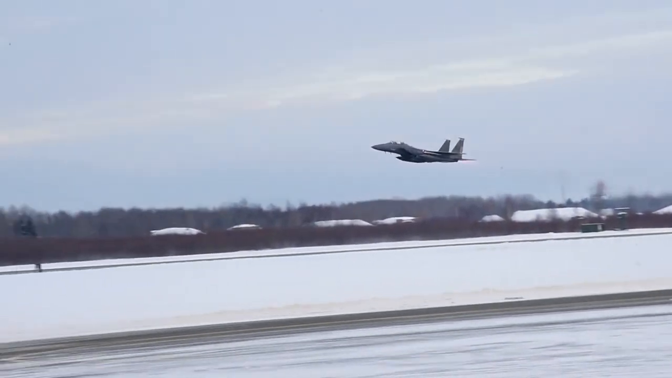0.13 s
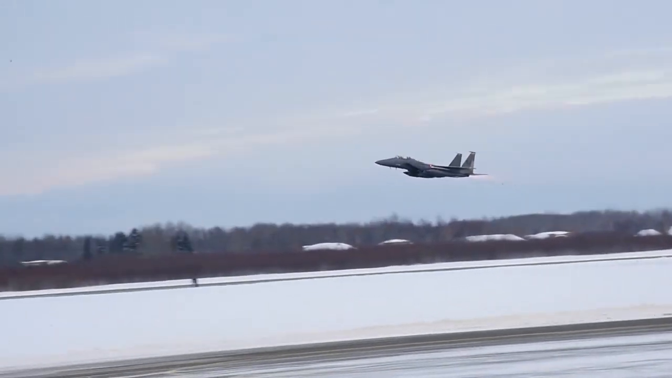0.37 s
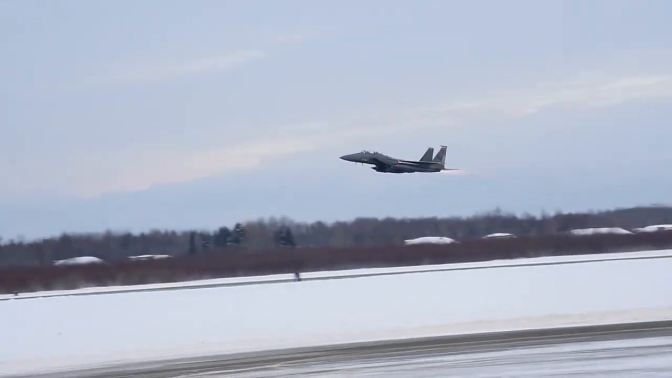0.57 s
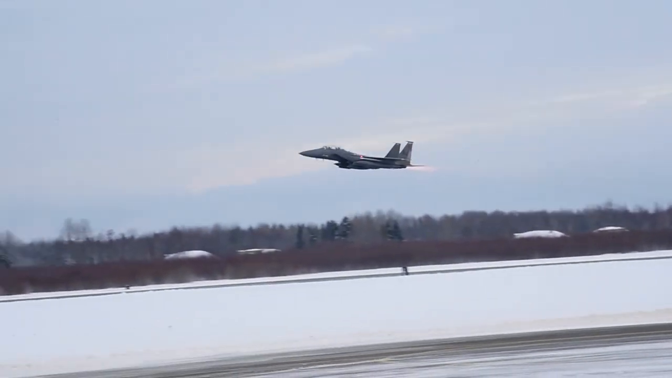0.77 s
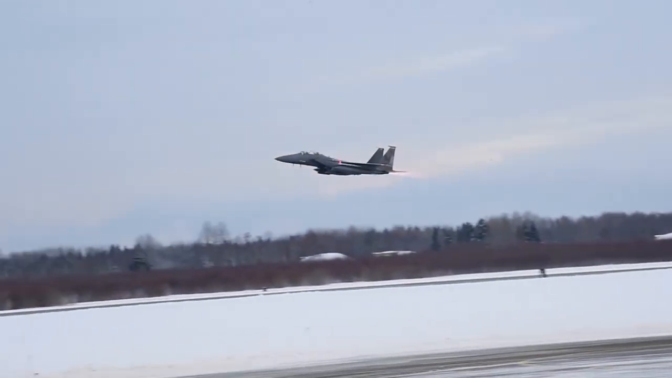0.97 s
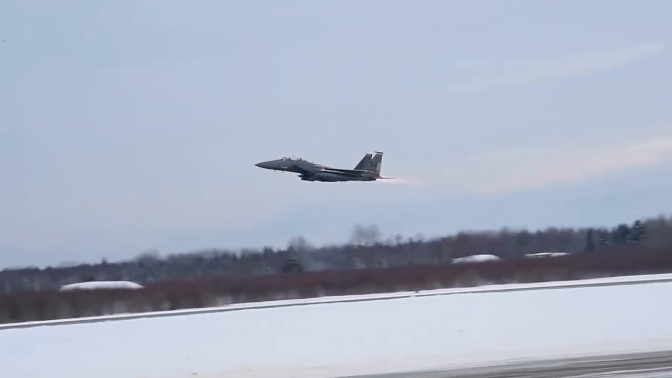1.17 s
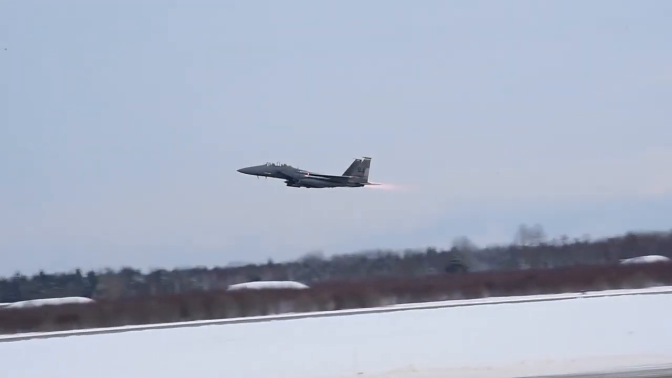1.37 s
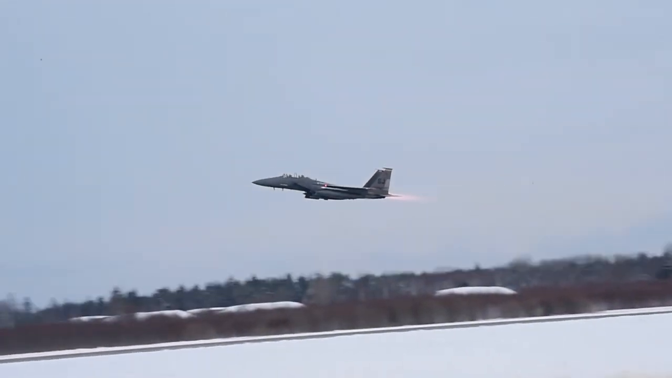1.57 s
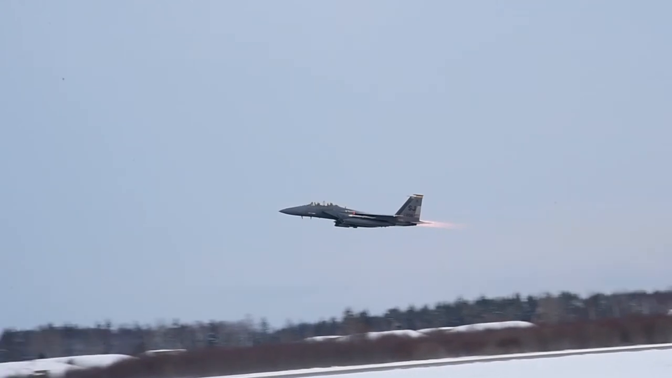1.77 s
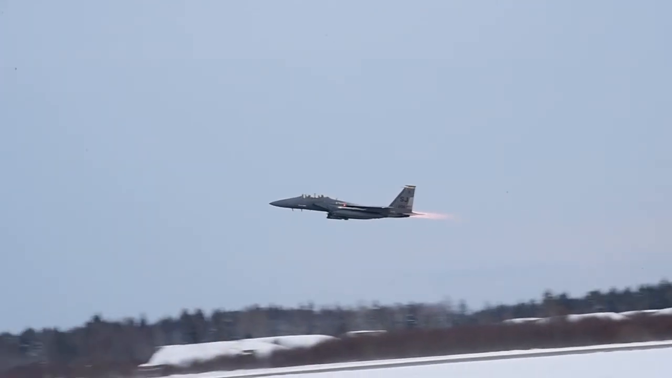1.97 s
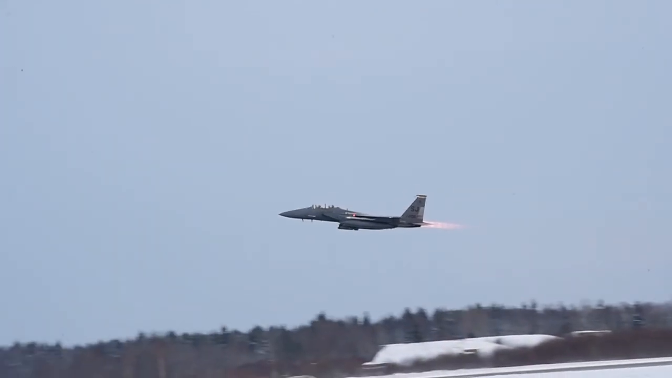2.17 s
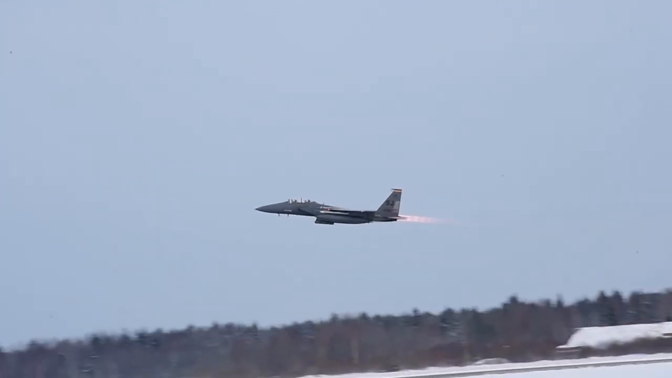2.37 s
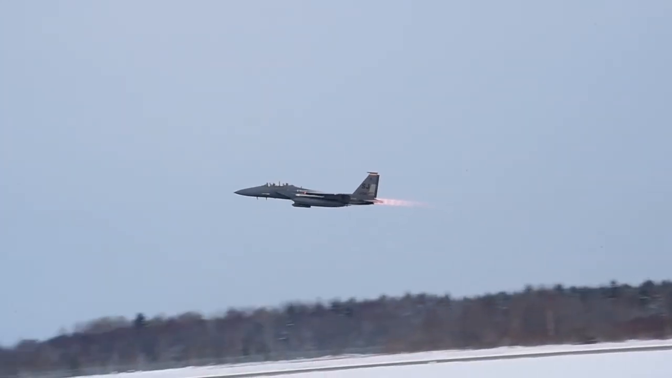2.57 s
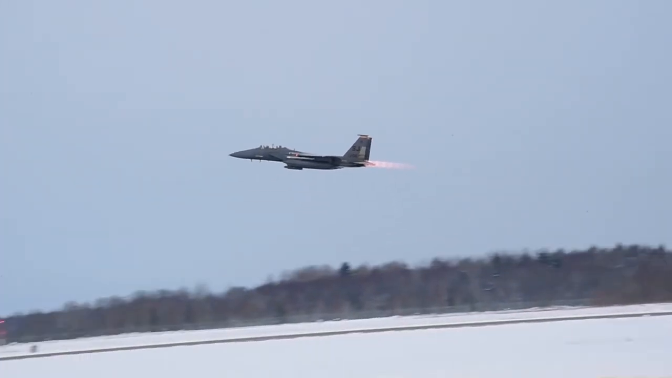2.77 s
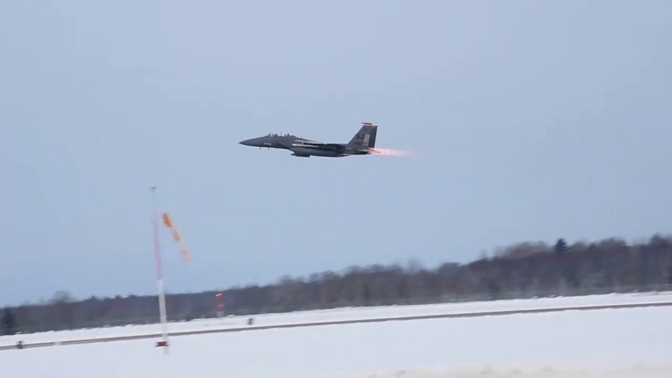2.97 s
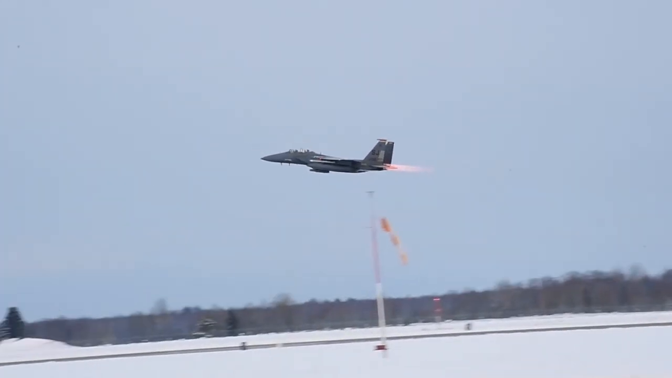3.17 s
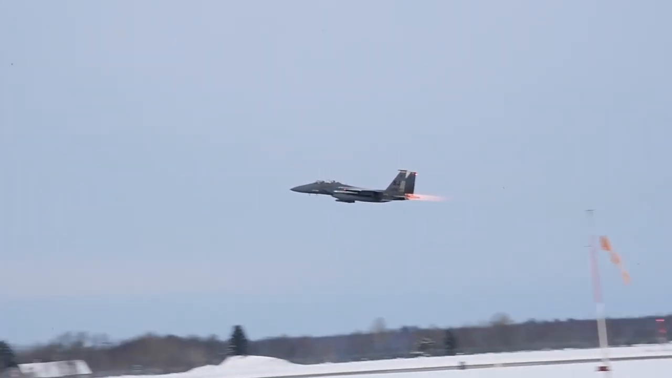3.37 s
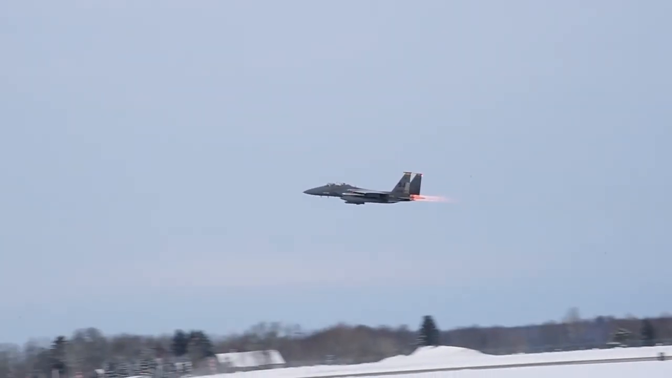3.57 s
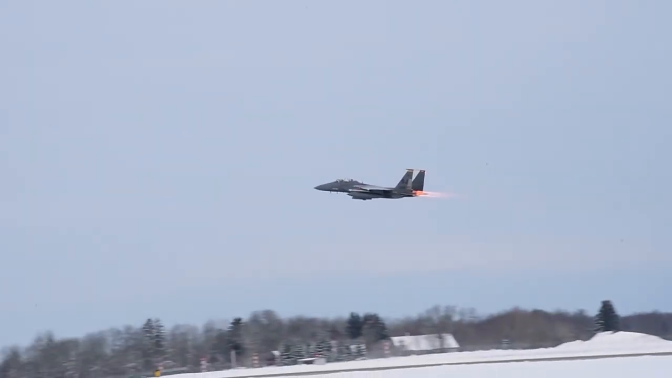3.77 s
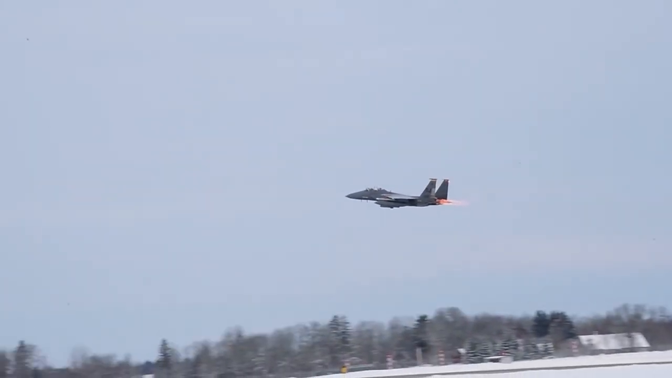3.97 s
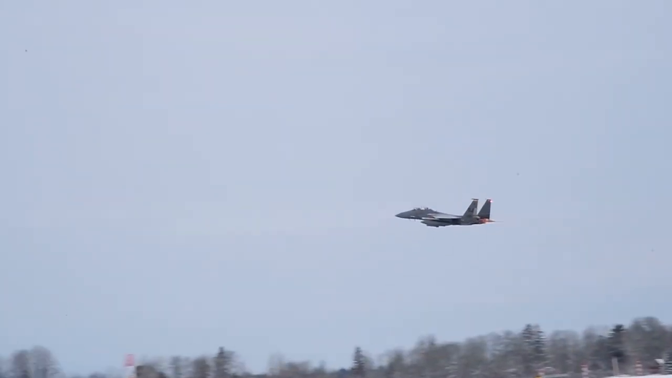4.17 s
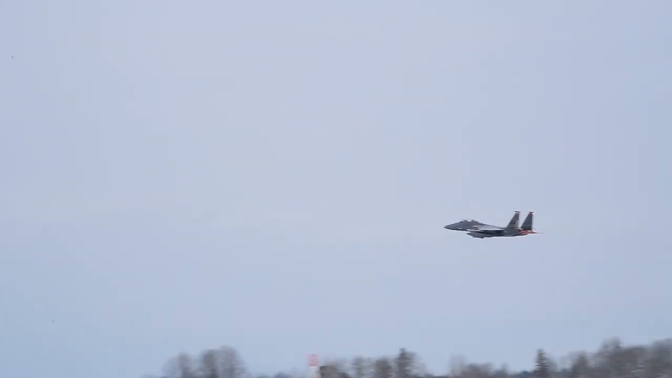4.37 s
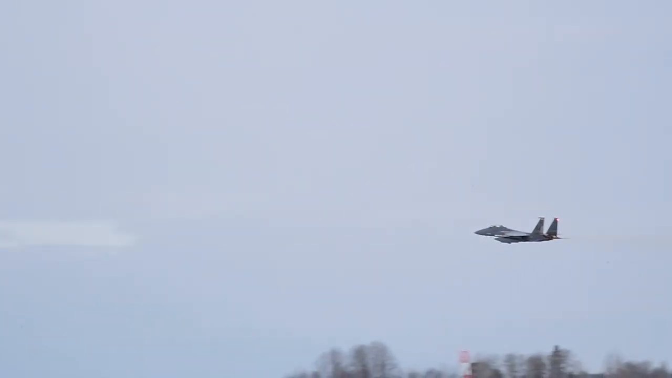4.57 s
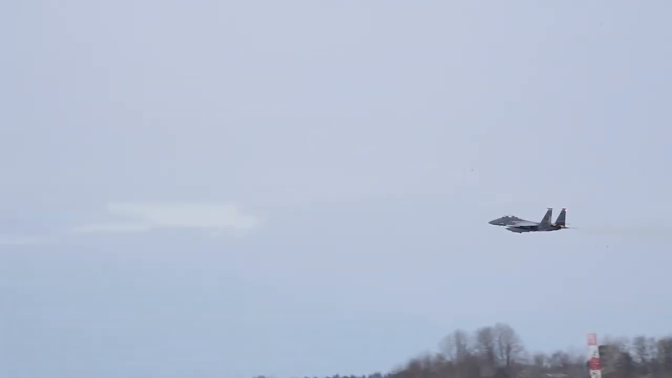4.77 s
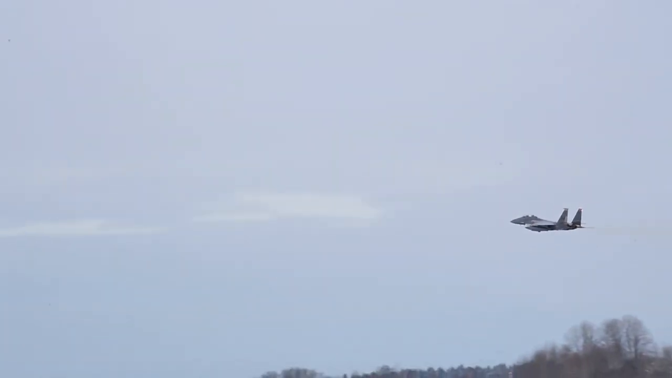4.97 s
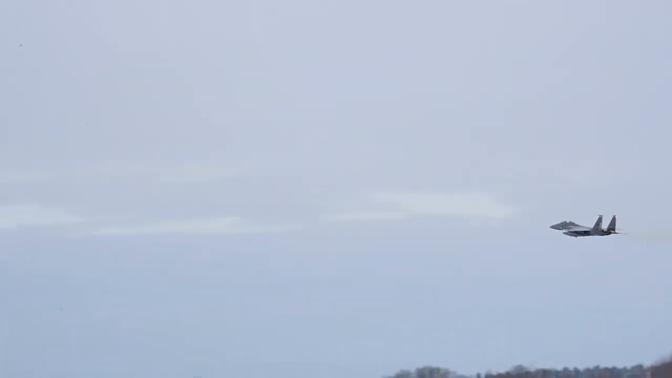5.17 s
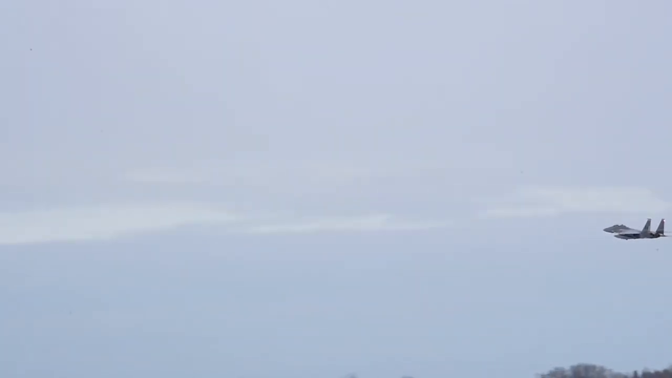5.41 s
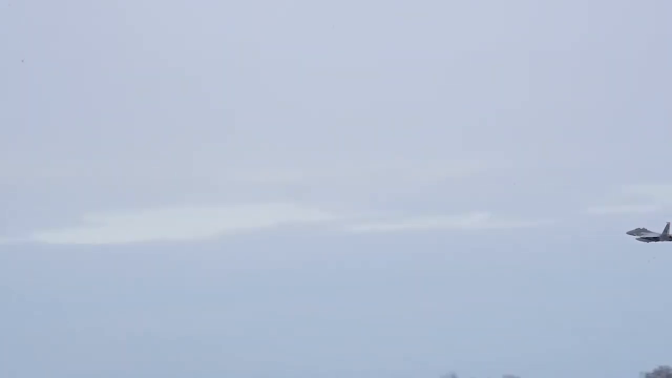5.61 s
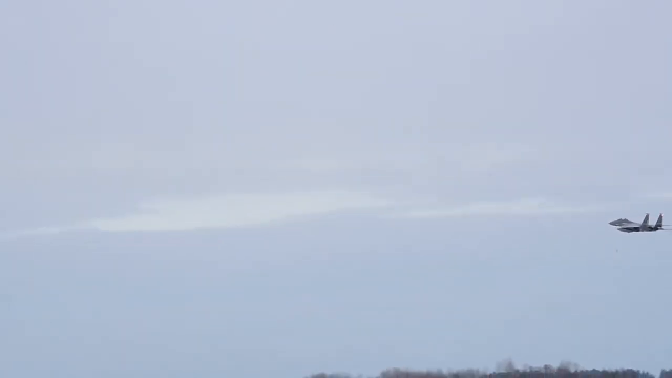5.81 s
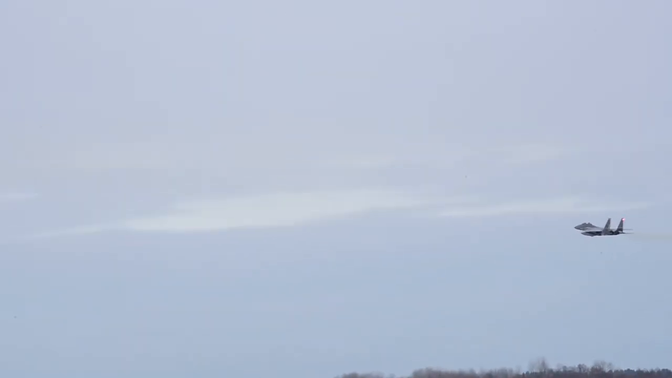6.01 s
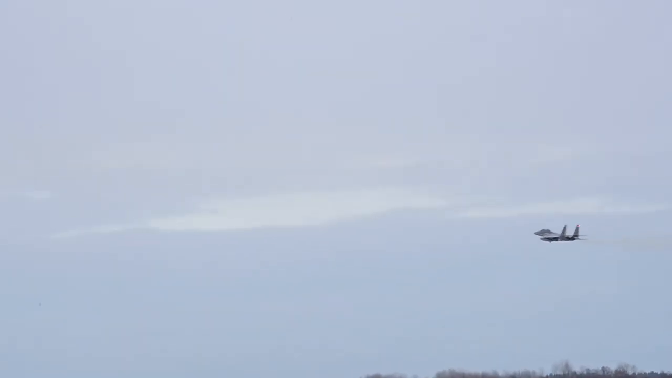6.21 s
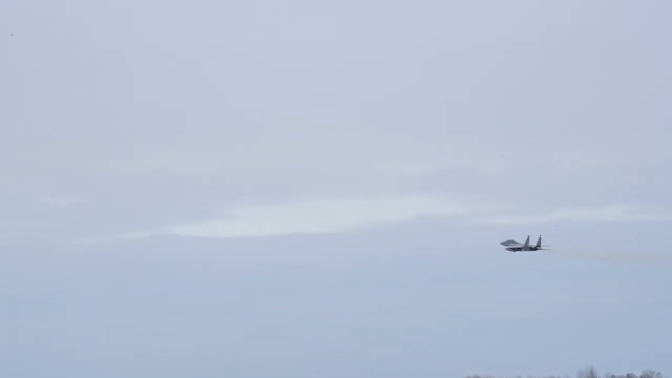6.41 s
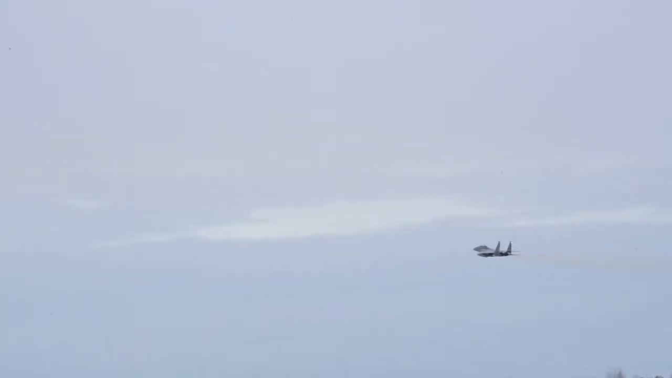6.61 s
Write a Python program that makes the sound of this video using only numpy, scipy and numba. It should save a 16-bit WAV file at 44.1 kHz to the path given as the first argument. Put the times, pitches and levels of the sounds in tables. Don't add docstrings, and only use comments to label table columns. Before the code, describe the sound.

A fighter jet on afterburner climbs away past the listener. First only a steady low drone of distant engines and faint wind, then sparse cracks, a fluttering mid-pitched howl and a fast tearing crackle. It passes with a heavy roar and hard pops, then recedes, still powerful but darker. Open snowy field, little echo, narrow stereo, slightly rounded peaks, no fade.

```python
import sys
import numpy as np
from scipy import signal
from scipy.fft import rfft, irfft, next_fast_len
from scipy.io import wavfile
from scipy.ndimage import uniform_filter1d, map_coordinates
from numba import njit

SR = 44100
rng = np.random.default_rng(int(sys.argv[2]) if len(sys.argv) > 2 else 0)


def bounce(signal):
    frames = np.transpose(np.atleast_2d(signal))
    limited = np.clip(frames, -1, 1)
    pcm = np.round(limited * 32767).astype(np.int16)
    wavfile.write(sys.argv[1], SR, pcm)


def volts_from_db(level):
    exponent = np.asarray(level, float) / 20
    return 10 ** exponent


N = 293265

# (time [s], plume power [dB], view from behind [0-1], treble lost in the air [dB])
FLYPAST = [(0, -38, 0.23, 3), (.2, -39.5, 0, 0), (.8, -38.5, 0.07, -10), (1.0, -29, 0, 1),
           (1.35, -30, 0.01, -1), (1.52, -28, 0, 4), (1.8, -26, 0.26, -0.5), (2.2, -21, 0.17, 0.5),
           (2.7, -22.5, 0.31, -5.5), (3.15, -25, 0.49, -9.5), (3.7, -21.5, 0.73, -0.5),
           (4.15, -20, 0.71, 4), (4.4, -21, 1, -2.5), (5.0, -22.5, 0.95, -6), (5.6, -21, 0.87, -3),
           (6.0, -20.5, 0.77, 6), (6.3, -20.5, 0.92, 12), (6.62, -21.5, 1, 17)]
# (time [s], howl centre [Hz], howl width [Hz], shock body top [Hz], front sharpness [dB])
EXHAUST_TONE = [(0, 470, 480, 1660, -17), (.85, 554, 445, 1770, 11), (1, 610, 340, 1810, 9),
                (1.12, 637, 330, 1780, 8), (1.24, 860, 403, 1830, 12.5), (1.36, 600, 350, 2010, 18),
                (1.6, 577, 370, 2130, 20), (1.9, 628, 312, 2080, 20), (2.2, 628, 374, 2120, 15),
                (2.7, 693, 460, 2180, 16), (3.0, 823, 467, 2170, 14.5), (3.2, 828, 497, 2250, 10),
                (3.7, 730, 523, 2280, 16.5), (4.15, 683, 450, 1970, 18), (4.6, 606, 430, 2080, 22),
                (5.6, 655, 440, 2030, 20), (6.1, 557, 423, 1760, 21), (6.65, 516, 420, 1680, 22)]
# (time [s], ground echo delay [ms], ground echo share [0-1],
# left port lag [samples], wavering of the lag [samples])
ARRIVAL = [(0, 0.11, 0.32, 4.1, 0.77), (1, 0.18, 0, 4.9, 0.55), (1.7, 0.45, 0, 5.44, 0.42),
           (2.0, 0.4, 0, 6.1, 0.23), (2.3, 0.16, 0, 5.9, 0.077), (2.6, 0.43, 0.01, 5.7, .2),
           (3.0, 0.3, 0.33, 5.8, 0.41), (3.4, 0.42, 0.62, 5.36, 0.2), (3.7, 0.39, 0.3, 5.8, 0.15),
           (3.95, 0.48, 0.76, 5.1, 0.22), (4.2, 0.58, 0.77, 5.5, 0.13), (4.55, 0.47, 0.5, 5.1, 0.4),
           (5.0, 0.48, 0.57, 4.8, 0.35), (5.6, 0.43, 0.61, 5.03, 0.38), (6.15, 0.58, 0.5, 5.3, 0.87),
           (6.65, 0.5, 0.25, 4.5, 1.4)]
# (time [s], share of the squared wave [0-1])
LOPSIDED_WAVES = [(0, 0), (.9, 0), (1.1, .22), (2.2, .2), (2.8, .13), (3.1, .02), (4, .05), (4.6, .19),
                  (5.4, .18), (6, .1), (6.65, .06)]

# (frequency [Hz], level [dB])
AIRFIELD_SPECTRUM = [(18, -74), (30, -26), (139, 5.5), (248, 4), (307, -14), (332, -7), (411, 7),
                     (436, 5.5), (1110, 0), (3090, -24.5), (4020, -66), (6800, -120)]
# (frequency [Hz], level [dB])
ROAR_SPECTRUM = [(35, -53), (60, -30.5), (152, -6), (225, 1.5), (367, 0), (436, -7.5), (480, -15),
                 (620, -7.5), (1060, -120)]
# (frequency [Hz], level [dB])
EDGE_SPECTRUM_AHEAD = [(5000, -34), (7500, -16.5), (9500, 1), (11500, 1.5), (13000, -1.5), (15500, 2)]
# (frequency [Hz], level [dB])
EDGE_SPECTRUM_BEHIND = [(5000, -38), (7500, -9.5), (10000, 1), (11500, 4.5), (13000, 6), (15500, 5)]
# (frequency [Hz], level [dB])
SCATTER_SPECTRUM_AHEAD = [(300, -27), (1500, -12.5), (3700, -15.5), (6000, -7.5), (12000, 2)]
# (frequency [Hz], level [dB])
SCATTER_SPECTRUM_BEHIND = [(300, -32), (1500, -16), (3200, -14), (4600, -7), (6500, -10.5), (12000, -5.5)]
# (frequency [Hz], level [dB])
LEFT_PORT_SHADE = [(500, 0), (1000, -1.2), (1700, -2.8), (3300, .6), (5000, -1.2), (8000, -2.6), (12000, 0)]
# (frequency [Hz], level [dB])
MICROPHONE_TREBLE = [(7000, 0), (9000, -5), (10500, -7.5), (12000, -10.5), (13500, -16.5), (14800, -18)]

# (time [s], level [dB], half length [s])
ROAR_ROLLS = [(.22, 5.5, .05), (.45, 6.5, .05), (1.8, -0.5, .1), (2.3, -6, 0.085), (2.95, 3, .1),
              (3.4, 1.5, 0.12), (4.05, 1, 0.063), (4.5, -1.5, 0.16), (5.0, 0, .1), (5.4, 0, 0.1),
              (5.75, 0.5, 0.08), (5.95, 3.5, 0.072), (6.3, 0.5, 0.11)]
# (time [s], level [dB], half length [s])
HOWL_SURGES = [(.42, 4, .04), (.51, 5.5, 0.039), (.8, -3, 0.063), (.96, 5, 0.032), (1.07, -1, 0.027),
               (1.13, 2.5, 0.033), (1.23, 1, 0.03), (1.33, -4.5, 0.078), (1.41, 7.5, 0.034),
               (1.5, -5, 0.029), (1.62, -1.5, 0.073), (1.76, -1, 0.039), (1.86, 1, 0.016),
               (1.93, -2.5, 0.033), (2.03, 0, 0.032), (2.42, 1, 0.021), (2.6, -0.5, 0.044),
               (2.8, -2, 0.033), (2.93, -2, 0.041), (3.15, 1.5, 0.02), (3.4, 0.5, 0.056), (3.72, -2, 0.025),
               (4.25, -0.5, 0.046), (5.45, -1, 0.044), (5.95, 0, 0.056), (6.05, -4.5, 0.039)]
# (time [s], level [dB], half length [s])
AIR_GUSTS = [(0.0, 15, 0.022), (0.51, 18, 0.027), (0.893, 6, 0.0091), (0.964, 7, 0.0077),
             (1.247, 6.5, 0.029), (1.314, 1.5, 0.026), (1.389, 12.5, 0.087), (1.618, 19, 0.058),
             (1.722, -5, 0.011), (1.861, 5.5, 0.029), (1.928, -1, 0.034), (1.98, 4, 0.092),
             (2.312, 5, 0.074), (2.422, -6, 0.028), (2.626, -3.5, 0.073), (2.817, -7.5, 0.018),
             (3.095, -5.5, 0.034), (3.24, -7.5, 0.024), (3.47, -3, 0.073), (3.617, 3.5, 0.052),
             (3.96, -4, 0.035), (4.034, 2.5, 0.025), (4.206, -5.5, 0.04), (4.48, -7, 0.032),
             (5.476, -10, 0.046), (5.882, -4, 0.12), (6.027, 3, 0.046), (6.112, -2, 0.083),
             (6.18, 7, 0.011), (6.64, 2.5, 0.013), (1.49, -3, 0.044), (2.14, 0.5, 0.0098), (2.54, 2, 0.048),
             (2.65, -2, 0.011), (2.885, 2.5, 0.0077), (3.02, 3, 0.025), (3.19, -1.5, 0.014), (3.21, 5, .01),
             (4.06, 2, 0.017), (4.11, -1.5, 0.032), (4.3, -0.5, .03), (5.6, -1, 0.073), (5.95, 2.5, 0.021),
             (6.0, 3.5, 0.017), (6.27, -8, 0.024), (6.39, 3, 0.037), (6.59, -1.5, 0.033)]

# (time [s], peak [dB])
LONE_SHOCKS = [(0.4723, -63), (0.4885, -55), (0.5097, -53), (0.607, -58), (0.8863, -59), (0.9248, -61),
               (0.96, -44), (0.999, -47), (1.0335, -43), (1.0714, -50), (1.0989, -43), (1.1494, -42),
               (1.203, -42), (1.2182, -29), (1.234, -36), (1.262, -30), (1.279, -39), (1.3089, -39)]
# (time [s], peak [dB])
NEARING_SHOCKS = [(1.2899, -41), (1.3088, -39), (1.3382, -38.5), (1.3613, -24), (1.3928, -30),
                  (1.4101, -37), (1.4213, -30), (1.5007, -46), (1.5375, -38), (1.5587, -33), (1.568, -29),
                  (1.5836, -28), (1.6206, -38), (1.6208, -27), (1.6622, -25), (1.6985, -39), (1.729, -49),
                  (1.7403, -36), (1.7619, -32), (1.783, -41), (1.8042, -43), (1.8225, -34), (1.866, -31),
                  (1.9469, -26), (1.9675, -27), (2.0405, -28), (2.08, -27), (2.113, -31), (2.1639, -22),
                  (2.1907, -26), (2.1983, -26), (2.2397, -24), (2.2726, -21), (2.2861, -28), (2.316, -28),
                  (2.3493, -19), (2.4333, -38), (2.4464, -27), (2.4635, -14), (2.4867, -23), (2.5076, -17),
                  (2.5201, -22), (2.6254, -20), (2.6353, -33), (2.637, -23), (2.6693, -23), (2.7071, -25),
                  (2.7199, -19), (2.757, -18), (2.8274, -23), (2.8538, -26), (2.8757, -23)]
# (time [s], peak [dB])
ABEAM_SHOCKS = [(2.938, -25), (2.9613, -19), (2.9886, -19), (3.0186, -19), (3.057, -20), (3.0889, -32),
                (3.1264, -19), (3.2066, -29), (3.238, -32), (3.2585, -37), (3.275, -27), (3.2953, -23),
                (3.3164, -21), (3.3332, -19), (3.377, -26), (3.4007, -22), (3.452, -22), (3.484, -35),
                (3.485, -25), (3.513, -30), (3.5122, -24), (3.5455, -27), (3.571, -29), (3.5798, -14),
                (3.5962, -21), (3.621, -26), (3.632, -26), (3.6477, -20), (3.672, -24), (3.6945, -23),
                (3.7429, -21), (3.7596, -40), (3.783, -25), (3.8192, -24), (3.8667, -22), (3.8954, -24),
                (3.946, -31), (3.973, -28), (3.9823, -30), (4.01, -24), (4.0587, -24), (4.092, -25),
                (4.1201, -37), (4.152, -28), (4.1789, -28), (4.2152, -31), (4.2277, -20), (4.253, -25),
                (4.267, -29), (4.2892, -19), (4.3096, -19), (4.374, -12)]
# (time [s], peak [dB])
BEHIND_SHOCKS = [(4.429, -24), (4.4517, -24), (4.4835, -27), (4.5217, -26), (4.5345, -26), (4.5684, -23),
                 (4.587, -20), (4.5919, -32), (4.617, -22), (4.6273, -28), (4.6807, -24), (4.7028, -23),
                 (4.7373, -19), (4.755, -19), (4.787, -24), (4.7933, -35), (4.8299, -29), (4.8433, -30),
                 (4.8646, -12), (4.8807, -26), (4.9018, -17), (4.9211, -21), (4.9487, -23), (4.962, -16),
                 (5.004, -24), (5.0119, -28), (5.018, -24), (5.0315, -22), (5.0528, -24), (5.0635, -21),
                 (5.0884, -24), (5.1032, -18), (5.1343, -20), (5.1651, -28), (5.1766, -32), (5.186, -23),
                 (5.1972, -22), (5.2214, -21), (5.232, -27), (5.251, -22), (5.277, -20), (5.3018, -27),
                 (5.3205, -20), (5.3437, -31), (5.3586, -20), (5.4018, -15), (5.4205, -31), (5.4403, -28),
                 (5.477, -37), (5.477, -13.5), (5.4984, -30), (5.5143, -20), (5.5612, -20), (5.5926, -17),
                 (5.6143, -25), (5.64, -19), (5.679, -19), (5.6904, -30), (5.6966, -24), (5.7313, -22)]
# (time [s], peak [dB])
LAST_SHOCKS = [(5.7444, -26), (5.763, -31), (5.7844, -22), (5.8085, -23), (5.8266, -23), (5.8494, -23),
               (5.8773, -31), (5.9032, -30), (5.9093, -27), (5.9224, -27), (5.9416, -22), (5.9561, -13),
               (5.9825, -29), (6.0202, -31), (6.0354, -16), (6.0676, -27), (6.096, -34), (6.1086, -30),
               (6.128, -35), (6.1676, -36), (6.1887, -16), (6.2246, -38), (6.2458, -29), (6.2663, -39),
               (6.2796, -48), (6.2907, -37), (6.325, -31), (6.334, -31), (6.3494, -39), (6.3714, -21),
               (6.3934, -39), (6.4018, -30), (6.4204, -22.5), (6.4441, -37), (6.4695, -38), (6.4832, -43),
               (6.5032, -37), (6.553, -46), (6.553, -38), (6.6044, -46), (6.6194, -33), (6.6366, -18)]

AIRFIELD_DB, WHINE_HZ, WHINE_DB = -31, 4160, -69
RUMBLE_DB, RUMBLE_HZ = -54.5, 45
HISS_DB = -89.5
ROAR_AHEAD_DB, ROAR_BEHIND_DB = -38.5, -18
HOWL_DB, BEAM_DB, BEAM_VIEW, BEAM_WIDTH = 4.5, 9, 0.51, 0.25
CRACKLE_DB, CRACKLE_PER_DB, FULL_POWER_DB = -42, 2.5, -22.5
GUST_IN_BODY, GUST_IN_HOWL = 0.45, 0.059
SHOCKS_PER_S, CRACK_DB = 800, -2
CLEAR_BEHIND_DB, DENSER_BEHIND_DB = -2.5, 2.5
TROUGH_AHEAD_DB, TROUGH_BEHIND_DB, HARD_JUMP = -6, -4, 6


def rms_one(x):
    return x / np.sqrt(np.mean(x ** 2) + 1e-20)


def in_time(rows):
    s, *columns = np.transpose(rows)
    return [np.interp(np.arange(N) / SR, s, c) for c in columns]


def butter(x, hz, kind, order):
    return signal.sosfilt(signal.butter(order, hz, kind, fs=SR, output="sos"), x)


def colour(x, points):
    hz, db = np.transpose(points)
    size = next_fast_len(N + 4096)
    bins = np.maximum(np.arange(size // 2 + 1) * SR / size, 1)
    gain = volts_from_db(np.interp(np.log(bins), np.log(hz), db))
    return irfft(rfft(x, size) * gain, size)[..., :N]


def drift(rate_hz):
    return rms_one(butter(rng.standard_normal(N + SR), rate_hz, "low", order=2)[SR:])


def later(x, samples):
    return map_coordinates(x, [np.arange(N) - samples], order=3, mode="nearest")


def swells(table):
    s = np.arange(0, N / SR + .002, .002)
    db = sum(db * np.exp(-((s - at) / max(half, .005)) ** 2) for at, db, half in table)
    return np.interp(np.arange(N) / SR, s, db)


def airfield():
    common, left, right = rng.standard_normal((3, N))
    ports = np.array([3.0 * common + 1.86 * left, later(common, 8.3) + 0.6 * right])
    hum = rms_one(colour(ports, AIRFIELD_SPECTRUM))
    whine = rms_one(butter(common, [WHINE_HZ - 160, WHINE_HZ + 160], "band", order=2))
    return volts_from_db(AIRFIELD_DB) * hum + volts_from_db(WHINE_DB) * whine


def wind():
    rumble = rms_one(butter(rng.standard_normal(N), RUMBLE_HZ, "low", order=4))
    return volts_from_db(RUMBLE_DB + 3.0 * drift(4)) * rumble


def amplifier_hiss():
    return volts_from_db(HISS_DB) * butter(rng.standard_normal((2, N)), [5000, 11500], "band", order=2)


def levels():
    power_db, behind, air_db = in_time(FLYPAST)
    gust_db = swells(AIR_GUSTS)
    roar_db = ROAR_AHEAD_DB + (ROAR_BEHIND_DB - ROAR_AHEAD_DB) * behind + swells(ROAR_ROLLS)
    beam_db = BEAM_DB * np.exp(-((behind - BEAM_VIEW) / BEAM_WIDTH) ** 2)
    howl_db = power_db + HOWL_DB + beam_db + GUST_IN_HOWL * gust_db + swells(HOWL_SURGES)
    body_db = power_db + GUST_IN_BODY * gust_db
    crackle_db = CRACKLE_DB + CRACKLE_PER_DB * (power_db - FULL_POWER_DB) - air_db + gust_db
    return roar_db, howl_db, body_db, crackle_db, behind


def shocks(eddies, crackle_db, behind):
    crowd_db = 1.8 * eddies + DENSER_BEHIND_DB * behind
    crowd_db = crowd_db + .45 * np.clip(crackle_db + 41, -25, 0)
    born = rng.random(N) < SHOCKS_PER_S * volts_from_db(crowd_db) / SR
    spread_db = 4.5 * np.minimum(rng.exponential(1, N), 2.4)
    jumps = born * volts_from_db(spread_db + 0.063 * eddies)
    jumps /= np.sqrt(uniform_filter1d(jumps ** 2, SR // 3) + 0.04)
    jumps *= volts_from_db(np.clip(crackle_db + 76, -14, 0))
    tables = (LONE_SHOCKS, NEARING_SHOCKS, ABEAM_SHOCKS, BEHIND_SHOCKS, LAST_SHOCKS)
    s, peak_db = np.transpose([row for table in tables for row in table])
    at = np.minimum((s * SR).astype(int), N - 1)
    jumps[at] = volts_from_db(np.clip(peak_db + CRACK_DB - crackle_db[at] + 10, 0, 28))
    return jumps + 1e-18


def mixing_roar(jumps):
    return rms_one(colour(rng.standard_normal(N) - 0.34 * jumps, ROAR_SPECTRUM))


@njit
def resonate(x, r, cosine):
    y = np.zeros_like(x)
    for i in range(2, len(x)):
        drive = (1 - r[i] ** 2) / 2 * (x[i] - x[i - 2])
        y[i] = drive + 2 * r[i] * cosine[i] * y[i - 1] - r[i] ** 2 * y[i - 2]
    return y


def shock_cell_howl(body, howl_hz, width_hz):
    cells = np.exp(-np.pi * width_hz / SR), np.cos(2 * np.pi * howl_hz / SR)
    turbulence = resonate(rng.standard_normal(N), *cells)
    howl = resonate(7.4 * turbulence - 0.5 * body, *cells)
    howl = butter(howl, [400, 2140], "band", order=4)
    return howl / np.sqrt(uniform_filter1d(howl ** 2, SR // 2))


def shock_thump(body, body_hz, behind):
    turbulence = 1.85 * volts_from_db(CLEAR_BEHIND_DB * behind) * rng.standard_normal(N)
    kick = butter(turbulence - body, 1340, "high", order=1)
    dull = np.clip((2200 - body_hz) / 600, 0, 1)
    crisp_kick = butter(kick, 2054, "low", order=4)
    dull_kick = butter(kick, 1606, "low", order=4)
    return rms_one((1 - dull) * crisp_kick + dull * dull_kick)


def shock_trough(jumps):
    hard = np.sqrt(np.maximum(jumps - HARD_JUMP, 0)) + 1e-18
    return rms_one(butter(butter(hard, 1320, "low", order=2), 330, "high", order=2))


def crackle_front(jumps, eddies, crackle_db, rear, sharp_db):
    hiss_db = 0.39 * eddies + 0.28 * np.clip(crackle_db + 31, -30, 0)
    hiss = rng.standard_normal(N) * volts_from_db(hiss_db)
    grain = jumps + .22 * hiss
    tick = butter(butter(grain, 3900, "low", order=2), 3460, "high", order=2)
    tick = rms_one(butter(tick, 10900, "low", order=2))
    steep = later(jumps ** 1.35 + .2 * hiss, 3)
    edge = (1 - rear) * colour(steep, EDGE_SPECTRUM_AHEAD) + rear * colour(steep, EDGE_SPECTRUM_BEHIND)
    return tick + volts_from_db(sharp_db - 26.5) * rms_one(edge)


def uneven_waves(plume):
    squared = plume ** 2 / np.sqrt(uniform_filter1d(plume ** 2, SR // 10))
    uneven = colour(squared, [(90, -29), (250, -6.5), (1500, -8.5), (3000, -11), (6000, -63)])
    return in_time(LOPSIDED_WAVES)[0] * uneven


def exhaust():
    roar_db, howl_db, body_db, crackle_db, behind = levels()
    howl_hz, width_hz, body_hz, sharp_db = in_time(EXHAUST_TONE)
    rear = np.clip(behind, 0, 1) ** 2
    eddies = drift(22)
    jumps = shocks(eddies, crackle_db, behind)
    body = rms_one(jumps ** .55)
    trough_db = body_db + TROUGH_AHEAD_DB + (TROUGH_BEHIND_DB - TROUGH_AHEAD_DB) * rear
    plume = volts_from_db(roar_db - 1.5) * mixing_roar(jumps)
    plume = plume + volts_from_db(howl_db - 1.0) * shock_cell_howl(body, howl_hz, width_hz)
    plume = plume + volts_from_db(body_db + 1.5) * shock_thump(body, body_hz, behind)
    plume = plume - volts_from_db(trough_db) * shock_trough(jumps)
    front = crackle_front(jumps, eddies, crackle_db, rear, sharp_db)
    return plume - uneven_waves(plume) + volts_from_db(crackle_db + 7.0) * front


def scattered(x, t60_s):
    time = np.arange(int(.04 * SR)) / SR
    out = 0
    for _ in range(4):
        cloud = rng.standard_normal((2, len(time))) * volts_from_db(-60 * time / t60_s)
        cloud /= np.sqrt(np.sum(cloud ** 2, 1)[:, None])
        out = out + signal.fftconvolve(x[None] * drift(44), cloud, axes=1)[:, :N] / 2
    return out


def surroundings(jet):
    cloud = scattered(jet, t60_s=.012)
    behind = np.clip(in_time(FLYPAST)[1], 0, 1) ** 4
    ahead_part = (1 - behind) * colour(cloud, SCATTER_SPECTRUM_AHEAD)
    return ahead_part + behind * colour(cloud, SCATTER_SPECTRUM_BEHIND)


def at_ports(jet):
    echo_ms, echo_share, lag, waver = in_time(ARRIVAL)
    lag = lag + waver * drift(200)
    ground = echo_share * butter(jet, 2740, "low", order=1)
    echo = echo_ms * SR / 1000
    right = jet + later(ground, echo)
    left = later(jet, lag) + later(ground, echo + 1.18 * lag)
    return np.array([colour(left, LEFT_PORT_SHADE), right])


def scene():
    background = airfield() + wind() + amplifier_hiss()
    jet = exhaust()
    return at_ports(jet) + surroundings(jet) + background


def band_limit(x):
    return signal.sosfilt(signal.butter(12, 15830, fs=SR, output="sos"), x)


def record(dry):
    x = butter(dry, 78, "high", order=2)
    mid, side = (x[0] + x[1]) / 2, (x[0] - x[1]) / 2
    side = colour(side, [(120, -58), (250, -30.0), (500, -7.0), (1000, 1.4), (2000, 1.1), (4000, -1.5)])
    x = np.array([mid + side, mid - side])
    x = x / (1 + np.abs(x / .87) ** 8) ** (1 / 8)
    x = colour(x, MICROPHONE_TREBLE)
    x = butter(x, 15000, "low", order=16)
    return band_limit(x)


dry = scene()
out = record(dry)
bounce(out)
```